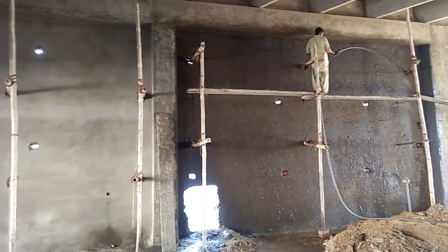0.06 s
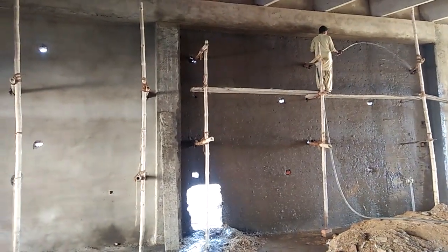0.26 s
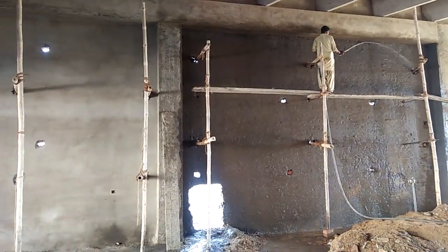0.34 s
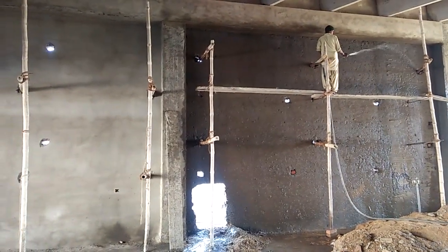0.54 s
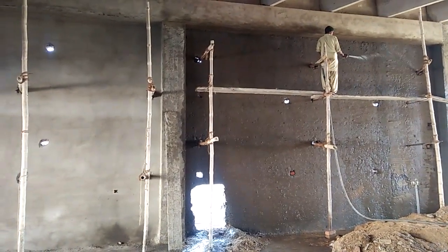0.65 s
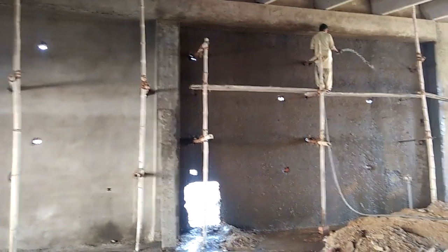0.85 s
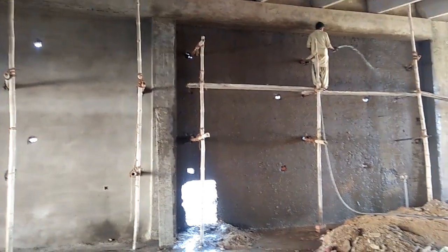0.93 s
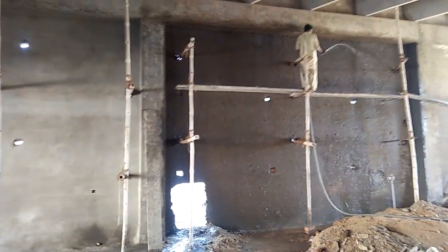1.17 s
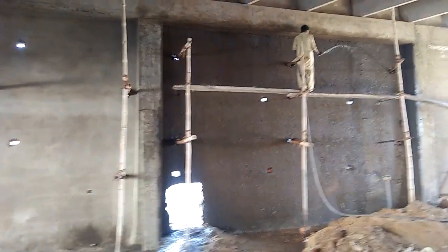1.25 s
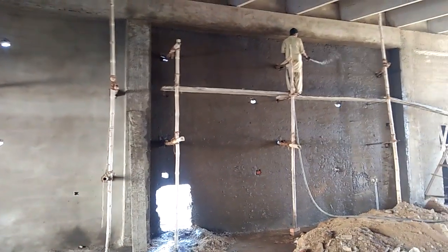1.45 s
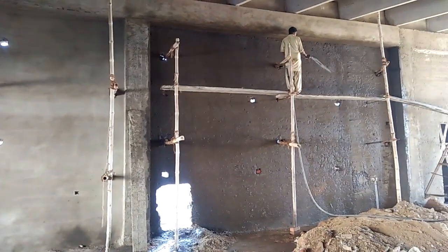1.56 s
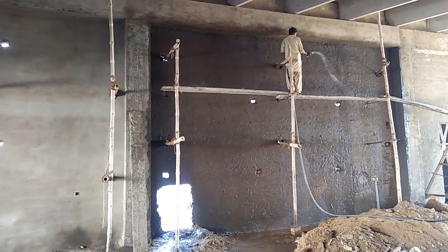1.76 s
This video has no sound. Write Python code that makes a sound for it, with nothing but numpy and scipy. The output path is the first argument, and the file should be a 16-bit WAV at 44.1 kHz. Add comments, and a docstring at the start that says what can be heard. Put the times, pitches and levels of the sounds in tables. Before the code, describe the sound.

Hose water splashes onto a wet plastered wall from about 0.2 seconds, with hissing spray, peaking near 0.4 seconds and dying away by 1 second in an echoing concrete hall. A low rumble swells from 0.6 seconds and eases after 1.2. From about 1.5 to 1.8 seconds, lighter splats and drips land among soft, hollow thuds. Faint building site noise lies underneath.

```python
"""Hose on a plastered wall

A hose is swung across wet plaster in a bare concrete hall, over faint building-site noise.
One heavy burst of drops drums on the wall and reverberates, and a low rumble swells after it.
Lighter splats follow, some ringing with trapped air, among hollow tones and dull thuds.
Fine drops hiss above them: many small random impacts add up to noise."""
import sys
import numpy as np
from scipy import signal
from scipy.fft import rfft, irfft, next_fast_len
from scipy.io import wavfile
from scipy.ndimage import uniform_filter1d

SR = 44100
rng = np.random.default_rng(int(sys.argv[2]) if len(sys.argv) > 2 else 0)


def unload_audio(sound):
    """Save the sound as a 16-bit wav file, at the path given as the first command line argument."""
    columns = np.transpose(np.atleast_2d(sound))
    # keep every value between -1 and 1, then stretch to whole-number steps
    steps = np.round(np.clip(columns, -1, 1) * 32767)
    wavfile.write(sys.argv[1], SR, steps.astype(np.int16))


N = 79380
TIME, BIN_HZ = np.arange(N) / SR, np.fft.rfftfreq(N, 1 / SR)
DROPS_PER_S, DROP_SPREAD_DB = 3200, 0.5
MIST_PER_S, MIST_SPREAD_DB = 9000, 3

# envelopes of the sustained sources: (time [s], level [dB])
SITE_LEVEL = [(0, -64), (.15, -65.5), (.8, -66.5), (1.42, -69.5), (1.8, -57.5)]
DEEP_BAND_LEVEL = [(0, -52.5), (.06, -77), (.5, -82), (.85, -62), (.95, -62), (1.12, -58), (1.2, -69),
                   (1.32, -61), (1.45, -65.5), (1.8, -90)]
RUMBLE_LEVEL = [(.1, -79), (.32, -57), (.42, -84), (.56, -56), (.63, -48), (.75, -53), (.9, -51.5),
                (1.05, -54.5), (1.2, -63.5), (1.42, -73.5), (1.55, -68), (1.8, -61)]
HALL_MODE_LEVEL = [(.55, -93), (.7, -55), (.84, -50), (.95, -51), (1.04, -49.5), (1.16, -55), (1.24, -53.5),
                   (1.42, -69.5), (1.52, -61.5), (1.8, -74.5)]
SPLASH_LEVEL = [(.168, -77), (.179, -48), (.19, -51), (.2, -40.5), (.28, -38), (.365, -37.5), (.44, -32.5),
                (.465, -31), (.53, -34.5), (.6, -40.5), (.72, -43), (.8, -49.5), (.92, -52), (1.0, -67),
                (1.25, -97)]
SPRAY_LEVEL = [(0, -82.5), (.165, -73.5), (.195, -58), (.26, -49.5), (.36, -47.5), (.395, -44.5),
               (.51, -47.5), (.58, -57.5), (.68, -68), (.8, -75), (.87, -104)]
SIZZLE_LEVEL = [(0, -84.5), (.17, -70.5), (.19, -50), (.215, -56), (.25, -50.5), (.33, -47), (.42, -63),
                (.62, -69), (.83, -75.5), (.89, -100), (1.56, -100), (1.61, -75), (1.65, -84),
                (1.668, -66.5), (1.78, -89)]
# spectral shapes of the sources: (frequency [Hz], relative level [dB])
SITE_SPECTRUM = [(20, -23.5), (55, -4), (110, -4.5), (200, -18.5), (290, -9.5), (370, -24), (440, -9.5),
                 (520, -18.5), (780, -9), (1400, -16), (2200, -21.5), (4300, -42.5), (7800, -38),
                 (14000, -43)]
RUMBLE_SPECTRUM = [(25, -28.5), (50, -6.5), (75, -11), (100, -3.5), (140, 4.5), (190, 1), (235, -1.5),
                   (272, 6), (325, 3), (372, -13.5), (440, -1.5), (530, -5.5), (700, -14), (1500, -22.5),
                   (4000, -54.5)]
SPLASH_SPECTRUM = [(60, -42.5), (140, -27), (310, -22.5), (370, -24), (440, -11), (520, -22.5), (600, -8),
                   (670, -13), (765, -1), (805, -3.5), (870, 3), (980, -6.5), (1130, 0), (1410, -0.5),
                   (1750, -8), (2300, -10), (2800, -14), (3500, -15), (4400, -23.5), (9000, -47)]
SPRAY_SPECTRUM = [(1500, -39), (3300, 5.5), (4200, -3.5), (5100, -1.5), (5950, 1.5), (6700, -3.5),
                  (7900, 1.5), (9700, -11.5), (14000, -10)]
SPATTER_SPECTRUM = [(1500, -10), (3200, 3.5), (4600, -1), (6500, 0), (7700, 12.5), (9500, -6), (11500, -9),
                    (14000, -4)]
SIZZLE_SPECTRUM = [(3000, -43), (6500, -7.5), (7700, 1), (9500, -2), (11500, -5.5), (14000, -3.5)]
# upper band edge of the splash: (time [s], cutoff [Hz])
SPLASH_CUTOFF = [(.17, 3900), (.5, 4300), (.62, 2900), (.76, 2276), (.9, 1410), (1.1, 1210)]
# slugs of water striking the wall:
# (time [s], level [dB], frequency [Hz], splat bandwidth [Hz], ring amplitude [0-1], decay [s])
SLUG_IMPACTS = [(.168, -52, 423.6, 50, 1, 0.17), (0.172, -47, 928, 165, 0.74, 0.12),
                (0.205, -42, 945, 477, 0.6, 0.15), (.21, -41, 771, 58, 0.84, 0.47),
                (0.37, -41.5, 1364, 450, 0.3, .06), (.381, -30, 1342, 478, 0.4, 0.084),
                (.39, -28, 1400, 403, 0.9, 0.073), (.406, -27, 1312, 302, 0.47, .11),
                (0.41, -32, 1138, 208.4, 0.88, 0.055), (0.414, -33.5, 852, 101, 0.75, 0.24),
                (1.231, -76.5, 2330, 1110, 0, 0.36), (1.254, -65.5, 1830, 1100, 0, .3),
                (1.284, -67.5, 1930, 1000, 0, 0.083), (1.66, -51, 1663, 696, 0.52, .13),
                (1.664, -66.5, 3020, 750, 0.2, 0.24), (1.687, -52, 1483, 900, 0.82, .08),
                (1.706, -53, 1430, 900, 0.85, 0.11), (1.764, -50.5, 1356, 244, 0.94, 0.085),
                (1.767, -55.5, 1874, 300, 0.86, .06)]
# stray sprays of fine drops: (time [s], level [dB], attack [s], decay [s])
STRAY_SPRAYS = [(.384, -48, 0.0053, 0.049), (0.992, -64.5, 0.02, 0.12), (1.265, -75.5, 0.02, 0.097),
                (1.582, -78, 0.039, 0.23), (1.657, -68.5, 0.0048, 0.17)]
# reverberation of the hall: (frequency [Hz], reverberation time [s])
REVERB_TIMES = [(125, 0.88), (1000, 0.98), (2000, 0.58), (4000, 0.4), (8000, 0.25), (14000, 0.084)]
# hollow tones among the thuds: (time [s], level [dB], frequency [Hz], decay [s])
HOLLOW_TONES = [(1.469, -58, 215.6, 0.51), (1.515, -61, 315, 0.81), (1.581, -54, 206.6, 0.2),
                (1.655, -52.5, 222, 0.57), (1.755, -59, 310, 0.96)]
# landings of falling water: (time [s], level [dB], decay [s])
LANDINGS = [(1.478, -60, 0.72), (1.658, -65, 1), (1.775, -55.5, 0.34)]
# resonances they excite: (frequency [Hz], half-bandwidth per stage [Hz], relative level [dB])
LANDING_MODES = [(234, 38, -5), (440, 27, -13), (627, 12, -2.5), (910, 74, -3), (1270, 150, -4)]
# stereo width: (frequency [Hz], side gain [dB])
SIDE_GAIN = [(3200, -73.5), (5000, -31.5), (7500, -7.5), (13000, -4.5)]


def from_db(db):
    """Amplitude ratio of a level in decibels."""
    return 10 ** (np.asarray(db) / 20)


def rms_one(x):
    """Normalisation to unit rms."""
    return x / np.sqrt(np.mean(x ** 2) + 1e-20)


def even_out(x, size):
    """Division by the running rms over `size` samples flattens the envelope."""
    return x / np.sqrt(uniform_filter1d(x ** 2, size=size) + 1e-3)


def envelope(rows):
    """Amplitude over time, interpolated in decibels."""
    return from_db(np.interp(TIME, *np.transpose(rows)))


def at_hz(points, hz):
    """Interpolation on a logarithmic frequency axis."""
    f, value = np.transpose(points)
    return np.interp(np.log(np.maximum(hz, 1)), np.log(f), value)


def colour(x, points):
    """Minimum-phase filter: folding the cepstrum makes the given response causal."""
    size = next_fast_len(2 * N)
    gain = from_db(at_hz(points, np.fft.rfftfreq(size, 1 / SR)))
    cepstrum = irfft(np.log(gain), size)
    cepstrum[1:size // 2] *= 2
    cepstrum[size // 2 + 1:] = 0
    return irfft(rfft(x, size) * np.exp(rfft(cepstrum)), size)[..., :N]


def resonate(x, hz, width_hz):
    """Two equal resonators in cascade give steep skirts; unit rms."""
    r = np.exp(-np.pi * width_hz / SR)
    stage = [1 - r, 0, r - 1, 1, -2 * r * np.cos(2 * np.pi * hz / SR), r * r]
    return rms_one(signal.sosfilt([stage, stage], x))


def drift(rate):
    """Random modulation: linear interpolation of `rate` Gaussian values a second."""
    knots = rng.standard_normal(512)
    return np.interp(TIME * rate, np.arange(len(knots)), knots)


def burst(start, attack, decay):
    """Linear rise, then exponential damping by 60 dB over the decay time."""
    age = TIME - start
    return np.clip(age / attack, 0, 1) * np.exp(-np.log(1000) * np.maximum(age - attack, 0) / decay)


def white_noise():
    """Gaussian noise, uncorrelated between mid and side."""
    return rng.standard_normal((2, N))


def drops(rate, spread_db):
    """Shot noise: independent impacts of uneven size, as mid and side; unit rms."""
    sizes = from_db(spread_db * np.minimum(rng.exponential(1, (2, N)), 4))
    signs = rng.choice([-1, 1], (2, N))
    hits = rng.random((2, N)) < rate / SR
    return rms_one(sizes * signs * hits) + 1e-18


def site():
    """The building site is a faint broadband noise floor, strongest in the bass."""
    return envelope(SITE_LEVEL) * rms_one(colour(white_noise(), SITE_SPECTRUM))


def rumble():
    """Two bands of low noise swell and fade; a hall mode, driven by noise, gives a rough resonance."""
    mode = even_out(resonate(white_noise(), hz=122.4, width_hz=14), size=2600)
    mode *= from_db(1.5 * drift(rate=27.7))
    broad = rms_one(colour(white_noise(), RUMBLE_SPECTRUM))
    deep = resonate(white_noise(), hz=57, width_hz=48)
    return (envelope(HALL_MODE_LEVEL) * mode + envelope(RUMBLE_LEVEL) * broad
            + envelope(DEEP_BAND_LEVEL) * deep)


def splash():
    """Impact noise of heavy drops on plaster: the spent jet lands more softly, so the band narrows."""
    patter = rms_one(colour(drops(DROPS_PER_S, DROP_SPREAD_DB), SPLASH_SPECTRUM))
    out, state, block = np.zeros((2, N)), np.zeros((2, 2, 2)), 512
    for i in range(0, N, block):
        cutoff_hz = np.interp(i / SR, *np.transpose(SPLASH_CUTOFF))
        lowpass = signal.butter(4, cutoff_hz, fs=SR, output="sos")
        out[:, i:i + block], state = signal.sosfilt(lowpass, patter[:, i:i + block], zi=state)
    return envelope(SPLASH_LEVEL) * out


def slaps():
    """Slugs of water land as clusters of impacts; trapped air resonates, rising in pitch as it dies."""
    cluster = drops(MIST_PER_S, DROP_SPREAD_DB)
    attack_s, pitch_rise = .0055, .1
    out = 0
    for start, db, hz, width, ring_gain, decay in SLUG_IMPACTS:
        band = signal.butter(3, [hz - width / 2, hz + width / 2], "band", fs=SR, output="sos")
        splat = even_out(signal.sosfilt(band, cluster), size=500)
        pitch = hz * (1 + pitch_rise * np.clip((TIME - start) / decay, 0, 1))
        ring = np.sqrt(2) * np.sin(2 * np.pi * np.cumsum(pitch) / SR)
        slap = ring_gain * ring + np.sqrt(1 - ring_gain ** 2) * splat  # constant power
        out += from_db(db) * burst(start, attack_s, decay) * slap
    return out


def glitter(x):
    """Amplitude modulation: treble bands flare independently as water films form and tear; unit rms."""
    spectrum, centres = rfft(x), np.linspace(3000, 14000, 36)
    depth_db = 3.2
    out = 0
    for share in np.eye(len(centres)):
        band = irfft(spectrum * np.interp(BIN_HZ, centres, share), N)
        out += band * from_db(depth_db * drift(rate=40))
    return rms_one(out)


def spray():
    """Shot noise of fine drops: a hiss with the burst, stray spatters, and the finest mist's sizzle."""
    mist = glitter(drops(MIST_PER_S, MIST_SPREAD_DB))
    finest = glitter(drops(MIST_PER_S, MIST_SPREAD_DB))
    strays = sum(from_db(db) * burst(start, attack, decay) for start, db, attack, decay in STRAY_SPRAYS)
    hiss = envelope(SPRAY_LEVEL) * rms_one(colour(mist, SPRAY_SPECTRUM))
    spatter = strays * rms_one(colour(mist, SPATTER_SPECTRUM))
    sizzle = envelope(SIZZLE_LEVEL) * rms_one(colour(finest, SIZZLE_SPECTRUM))
    return hiss + spatter + sizzle


def hall(x):
    """Diffuse reverberation: convolution with noise whose octaves each decay at their own rate."""
    spectrum, centres = rfft(white_noise()), np.geomspace(62.5, 16000, 9)
    response = 0
    for centre, share in zip(centres, np.eye(len(centres))):
        band = irfft(spectrum * at_hz(np.transpose([centres, share]), BIN_HZ), N)
        response += band * burst(start=0.0016, attack=0.036, decay=at_hz(REVERB_TIMES, centre))
    response *= np.sqrt(2 * np.log(1000) / SR)  # about unit energy for a decay of 1 s
    return signal.fftconvolve(x, response, axes=-1)[:, :N]


def hollow_tones():
    """Damped sinusoids swell and ring on, low and hollow."""
    out = 0
    for start, db, hz, decay in HOLLOW_TONES:
        tone = np.sqrt(2) * np.sin(2 * np.pi * hz * (TIME - start))
        out += from_db(db) * burst(start, attack=0.019, decay=decay) * tone
    return out


def thuds():
    """Impact excitation: falling water lands dully and drives a few low resonances."""
    fall = drops(DROPS_PER_S, DROP_SPREAD_DB)
    body = sum(from_db(db) * resonate(fall, hz, 2 * half_width) for hz, half_width, db in LANDING_MODES)
    gain = sum(from_db(db) * burst(start, attack=0.01, decay=decay) for start, db, decay in LANDINGS)
    return gain * rms_one(body)


def scene():
    """Superposition of direct and reverberant sound; only the treble has stereo width."""
    background = site() + rumble()
    heavy, slugs, fine = splash(), slaps(), spray()
    reverb = hall(from_db(-7) * heavy + from_db(-9) * slugs + from_db(-6) * fine)
    mid, side = background + heavy + slugs + fine + reverb + hollow_tones() + thuds()
    side = colour(side, SIDE_GAIN)
    return np.array([mid + side, mid - side])


def record(dry):
    """Band limiting: an elliptic low-pass cuts the top of the treble steeply."""
    cutoff_hz = 14330
    return signal.sosfilt(signal.ellip(12, .2, 80, cutoff_hz, fs=SR, output="sos"), dry)


dry = scene()
out = record(dry)
unload_audio(out)
```